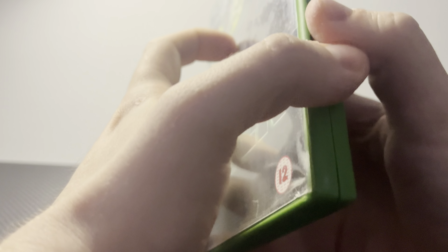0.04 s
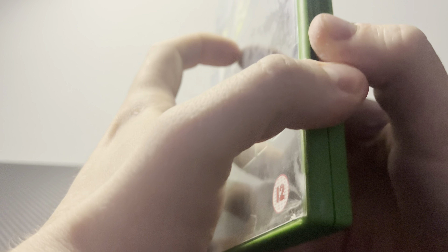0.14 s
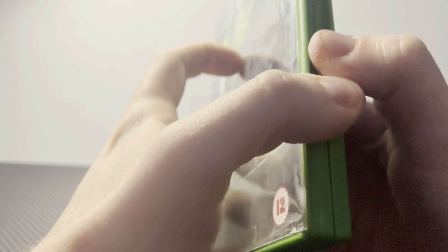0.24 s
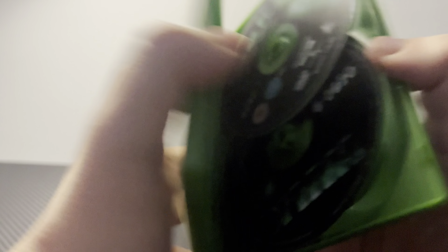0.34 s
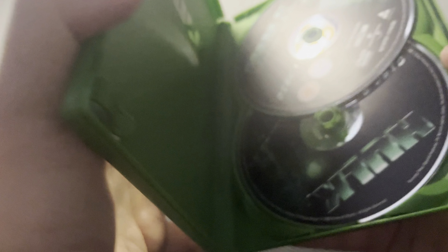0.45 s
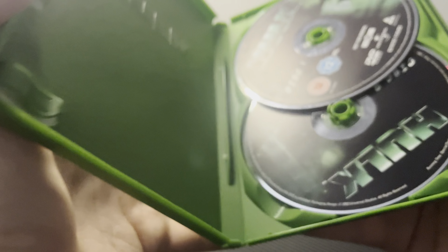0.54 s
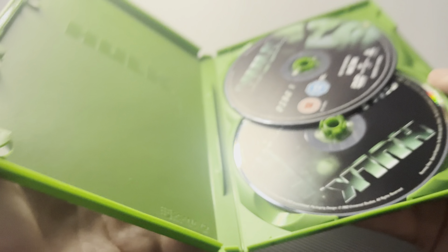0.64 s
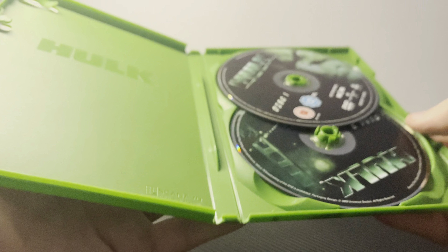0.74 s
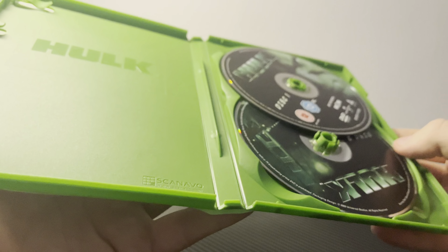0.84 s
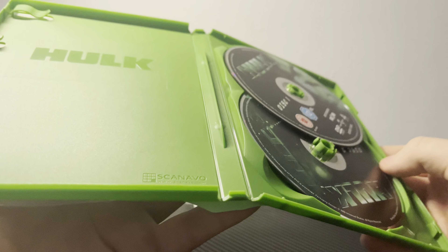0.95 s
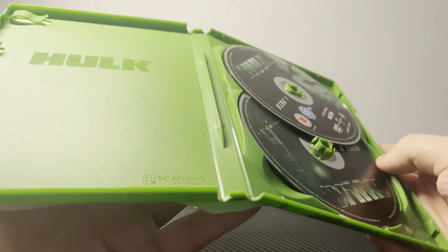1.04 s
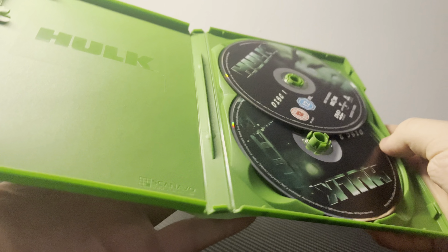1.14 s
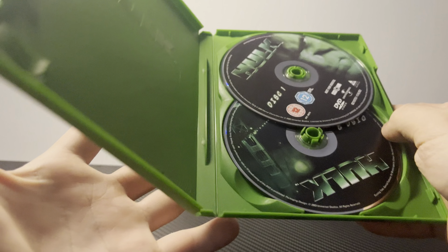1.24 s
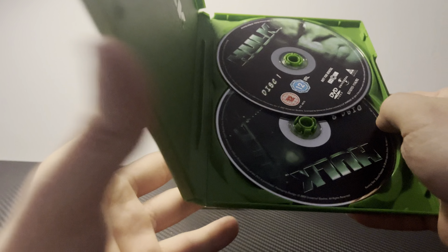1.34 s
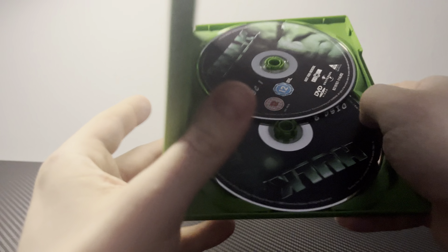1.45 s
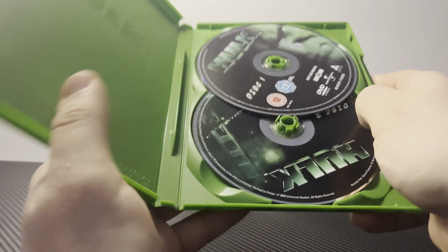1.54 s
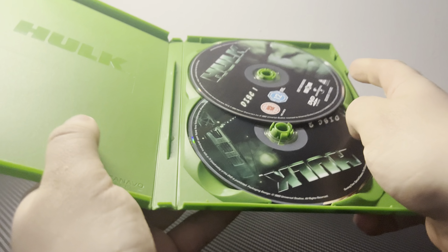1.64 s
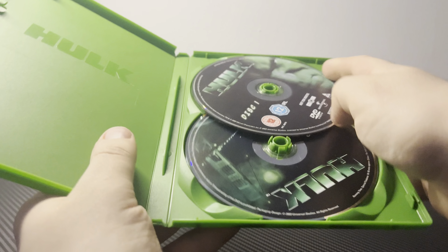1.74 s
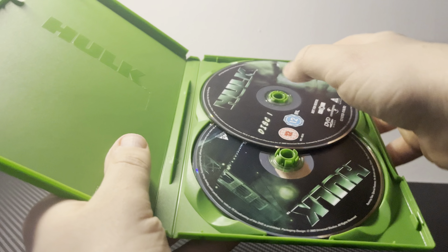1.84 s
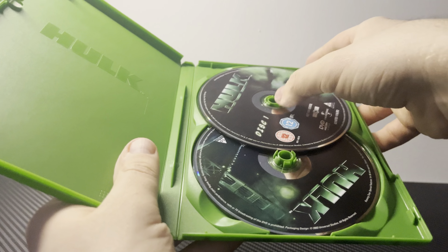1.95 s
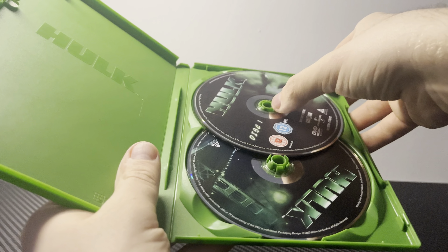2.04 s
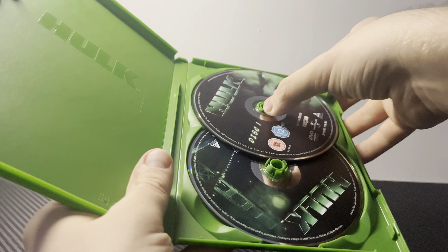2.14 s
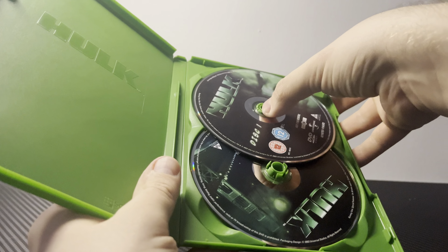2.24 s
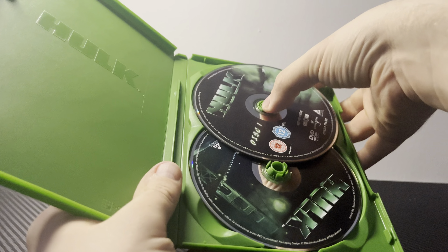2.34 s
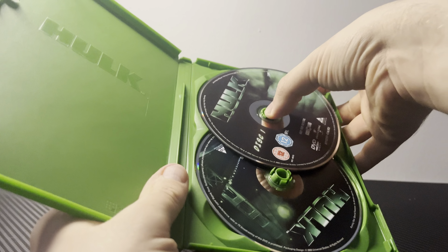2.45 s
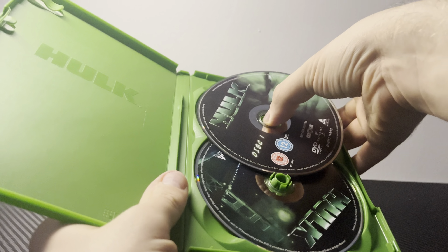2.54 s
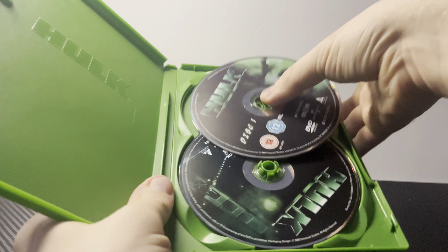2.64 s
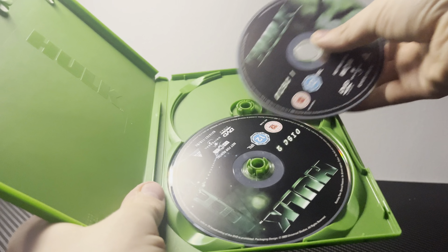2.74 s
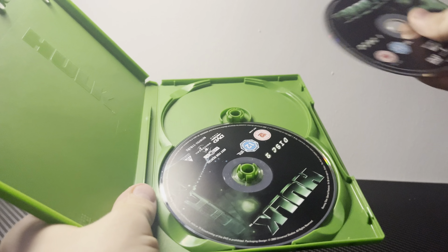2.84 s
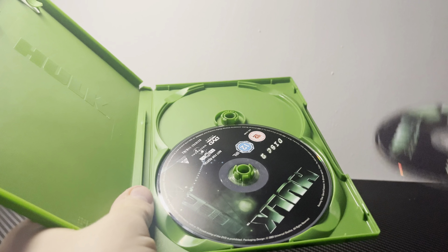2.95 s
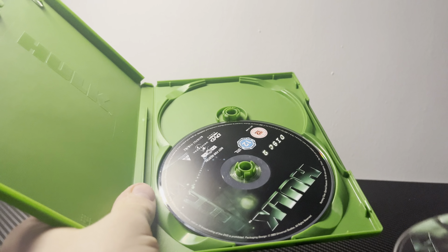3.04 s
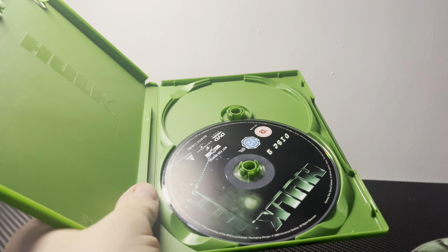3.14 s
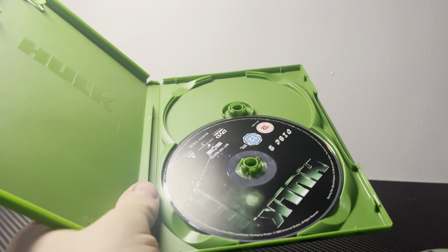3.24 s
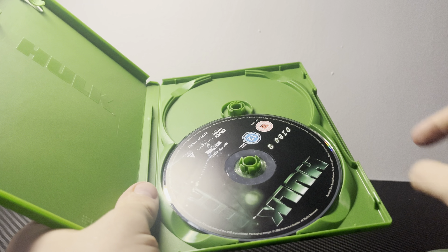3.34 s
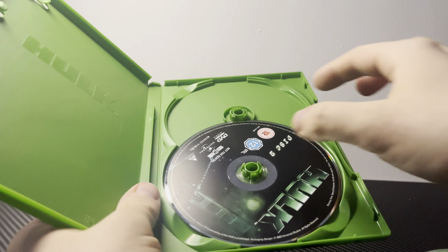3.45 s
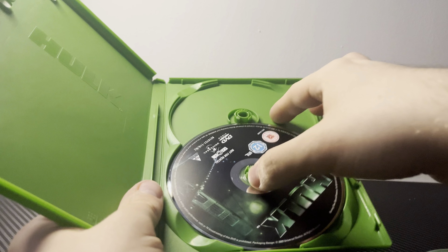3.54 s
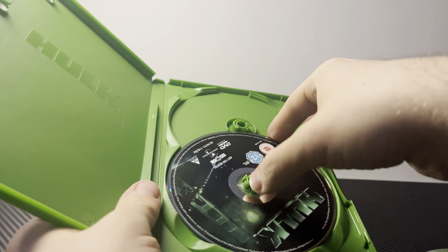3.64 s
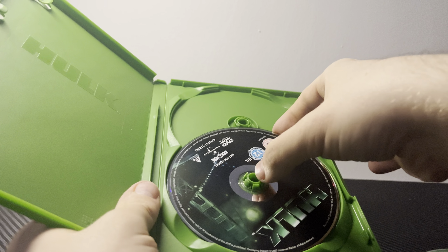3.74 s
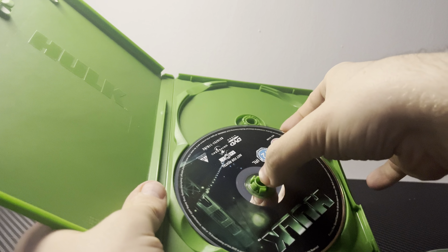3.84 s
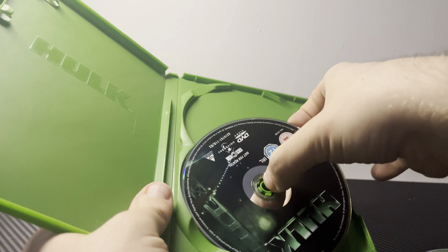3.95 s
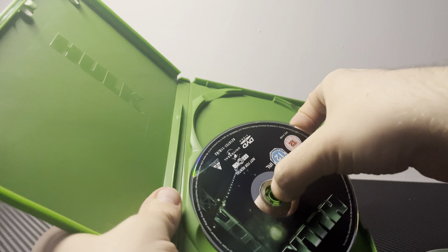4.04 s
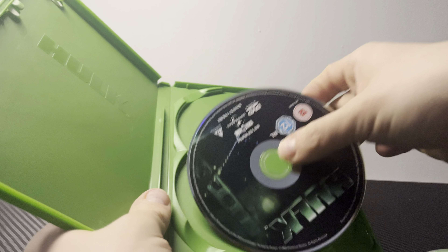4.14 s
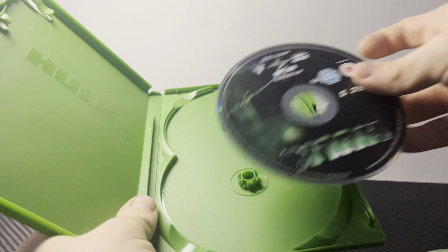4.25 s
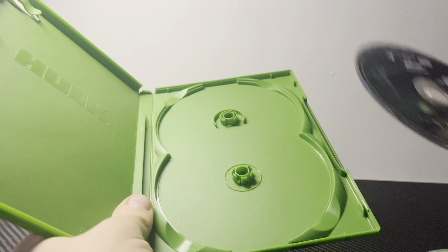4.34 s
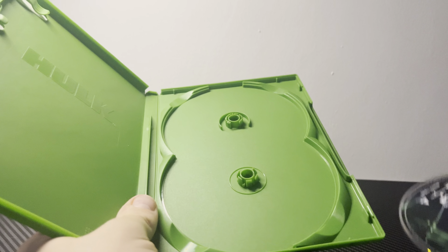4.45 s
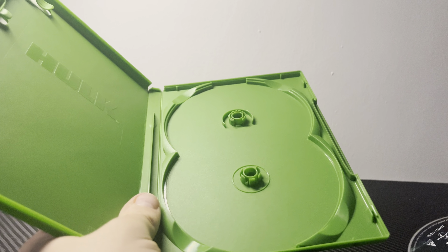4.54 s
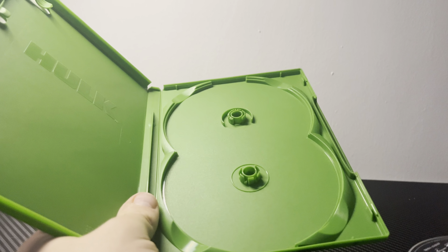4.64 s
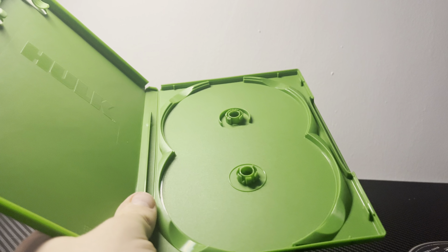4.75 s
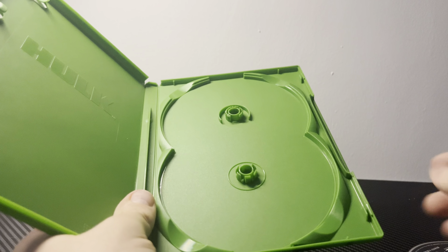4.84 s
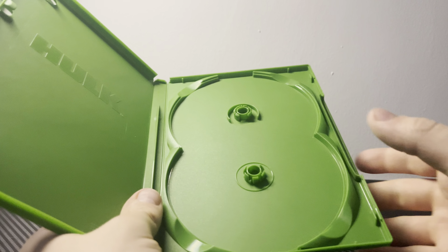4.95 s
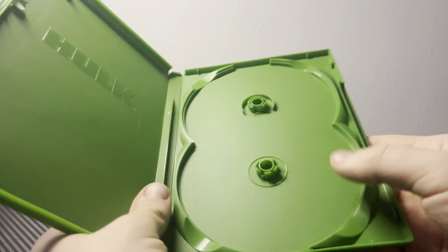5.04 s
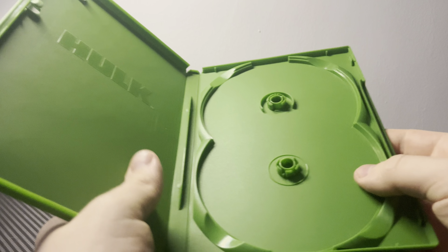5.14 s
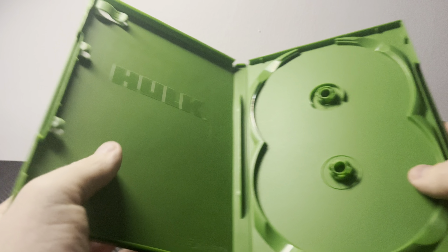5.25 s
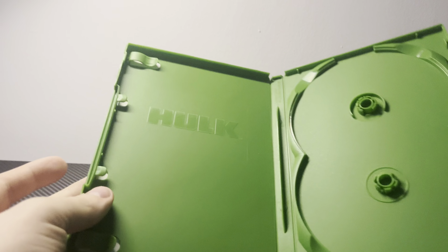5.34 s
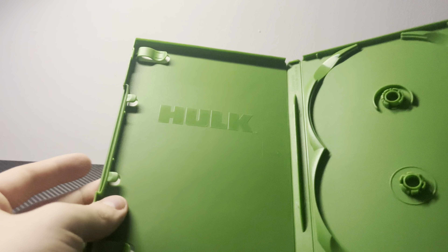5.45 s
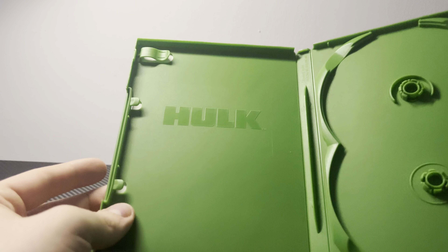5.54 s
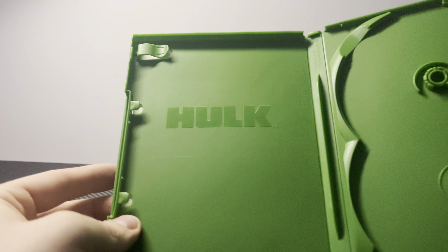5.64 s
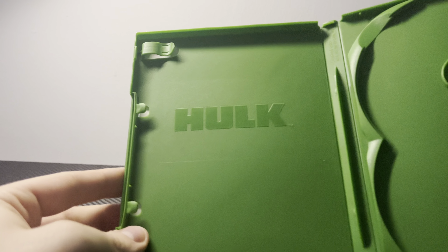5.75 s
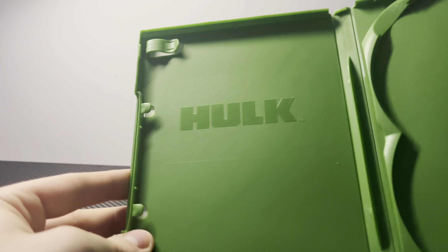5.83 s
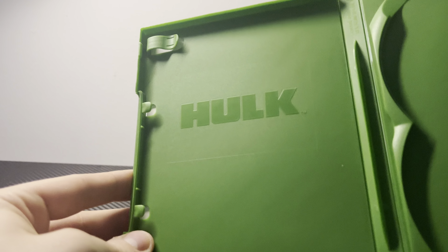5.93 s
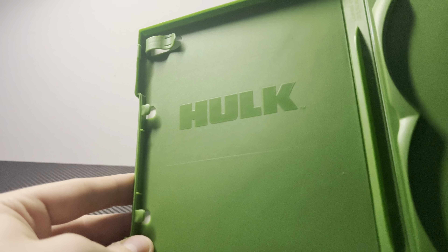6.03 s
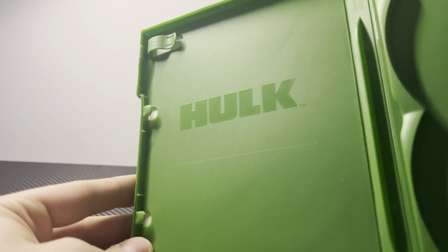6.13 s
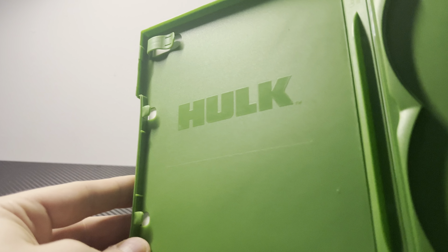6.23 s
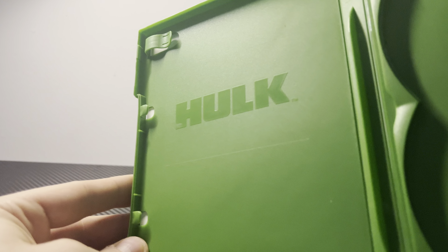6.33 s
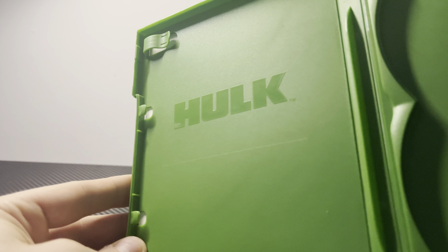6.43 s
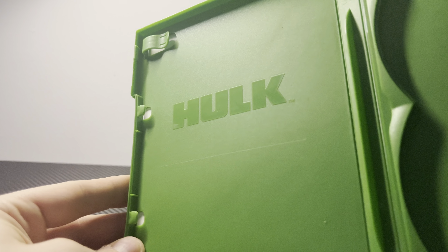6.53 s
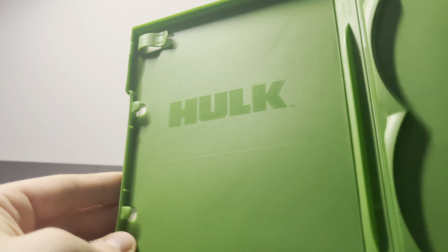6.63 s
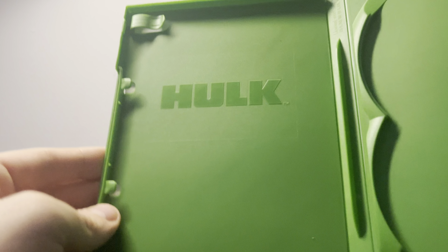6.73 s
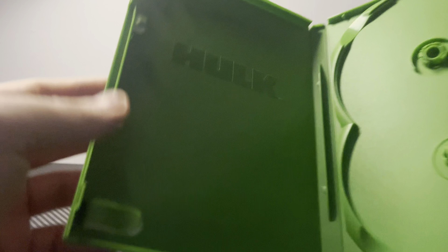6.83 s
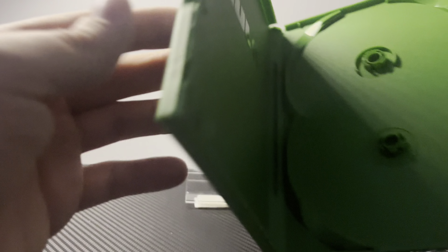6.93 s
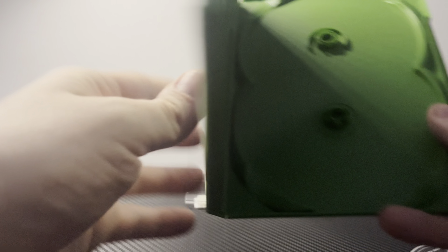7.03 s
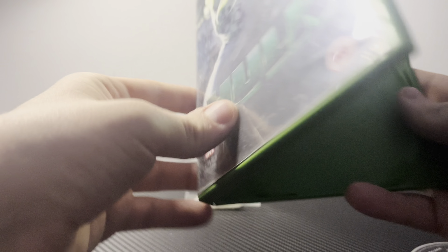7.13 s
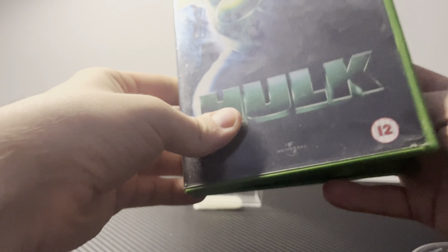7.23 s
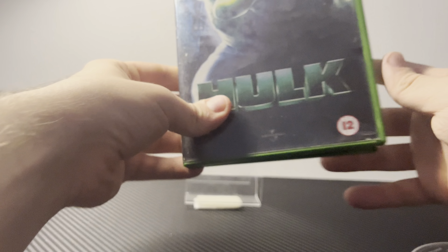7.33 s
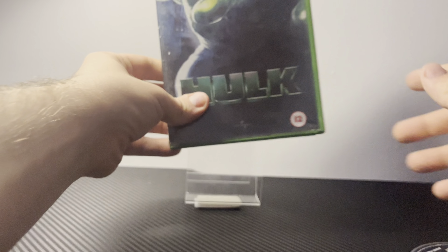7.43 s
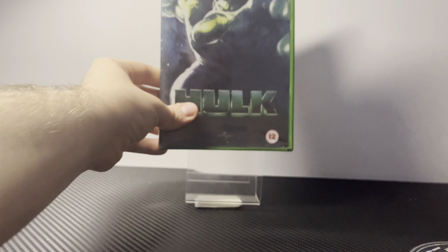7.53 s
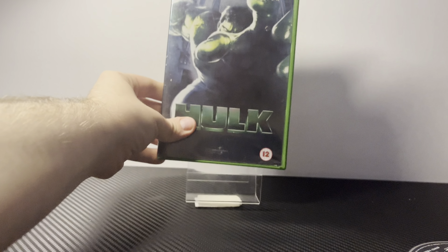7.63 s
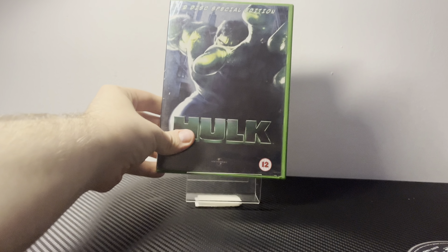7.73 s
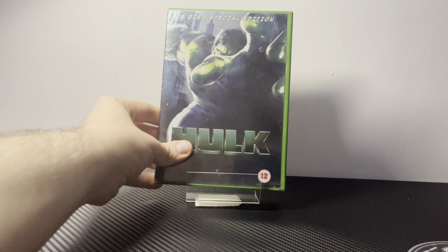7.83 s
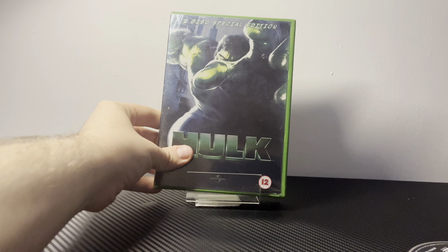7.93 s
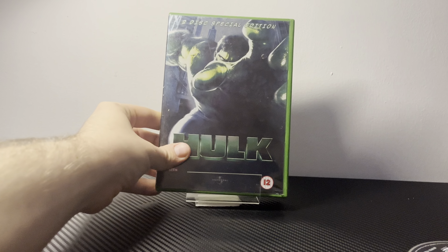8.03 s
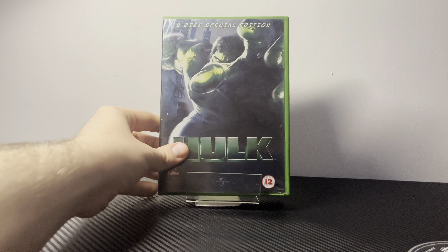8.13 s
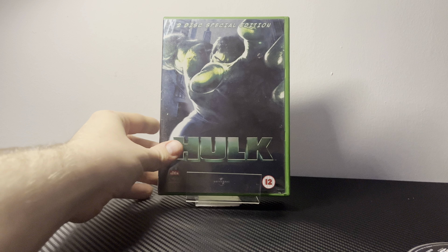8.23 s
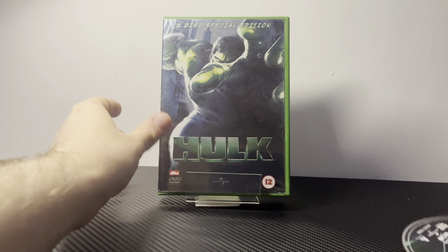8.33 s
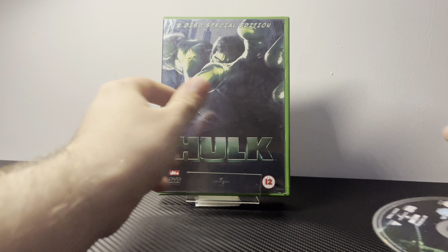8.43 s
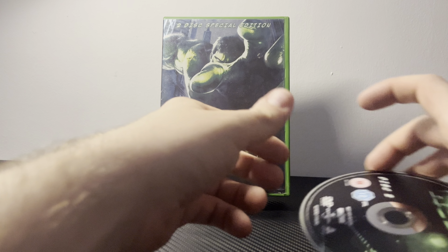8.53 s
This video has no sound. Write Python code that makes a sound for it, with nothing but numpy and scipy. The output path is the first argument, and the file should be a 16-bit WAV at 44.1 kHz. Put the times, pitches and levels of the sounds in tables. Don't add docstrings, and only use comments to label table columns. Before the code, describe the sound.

Dry, detailed handling of hard plastic over faint room air and mains hum. A hard opening crack comes first, trailed by creaks, loose ticks and skin rubbing. Two discs are pressed free in turn with bright double snaps, brief rings and soft thuds on the table. Quieter rubbing and gentle closing clicks lead to a hollow knock and small scrapes as the case settles on a rack. Close stereo phone pickup, short soft room tail.

```python
import sys
import numpy as np
from scipy import signal
from scipy.fft import rfft, irfft
from scipy.io import wavfile
from scipy.ndimage import uniform_filter1d

SR = 44100
rng = np.random.default_rng(int(sys.argv[2]) if len(sys.argv) > 2 else 0)


def inscribe(sig):
    pcm = np.round(np.clip(np.atleast_2d(sig).T, -1, 1) * 32767)
    wavfile.write(sys.argv[1], SR, pcm.astype(np.int16))


def voltage_ratio(decibels):
    exponent = np.asarray(decibels, float) / 20
    return 10 ** exponent


N = 378378

# [f/Hz, level/dB, t60/s]
CASE_MODES = [(370, -2, 0.033), (697, 1.5, 0.034), (980, -16, 0.043), (1440, -1, 0.0042),
              (2310, 6.5, 0.013), (2400, -3.5, 0.0065), (2610, -0.5, 0.014), (3314, -4.5, 0.04),
              (3920, -6, 0.058), (4800, -10.5, 0.029), (4990, -12, 0.012)]
# [f/Hz, level/dB, t60/s]
RACK_MODES = [(291, -4, 0.29), (740.4, 6, 0.052), (952, 4.5, 0.044), (1004, 8.5, 0.052), (1520, -4, 0.024),
              (1800, -20.5, 0.02), (2564, 3, 0.0093), (5000, -10, .04)]
# [t/s, level/dB]
GRIP = [(0.0, -76), (0.45, -51.5), (0.83, -65), (2.05, -51.5), (2.29, -67.5), (2.79, -57.5), (3.6, -57),
        (4.34, -60), (5.61, -60), (6.3, -74.5), (6.8, -72.5), (7.28, -58.5), (7.49, -67.5), (7.99, -50),
        (8.26, -63.5), (8.57, -77.5)]
# [t/s, lean (1 = usual left lean)]
LEAN = [(0, 0.75), (.7, 1.31), (1.3, 0.82), (2.5, 0.88), (3.3, 0.7), (4.2, 1.8), (5.5, 0.97), (6.8, 2),
        (7.2, 0.32), (7.6, 1.04), (8.5, 1.1)]
HANDS_PAN_DB = 5


def on_log(hz, table):
    f, v = np.transpose(table)
    return np.interp(np.log(hz + 1), np.log(f), v)


def over_time(t, table):
    return np.interp(t, *np.transpose(table))


def colour(x, table):
    gain = voltage_ratio(on_log(np.fft.rfftfreq(x.shape[-1], 1 / SR), table))
    y = irfft(rfft(x) * gain, x.shape[-1])
    return y / np.sqrt(np.mean(y ** 2))


def pair(size):
    # [f/Hz, likeness (0-1)]
    likeness = [(100, 0.8), (500, 0.2), (2000, 0.5), (4000, 0.2), (12000, 0.9)]
    like = np.clip(on_log(np.fft.rfftfreq(size, 1 / SR), likeness), 0, 1)
    mid, side = rfft(rng.standard_normal((2, size)))
    return irfft(mid * np.sqrt(1 + like) + side * np.sqrt(1 - like) * np.array([[1], [-1]]), size)


def walk(rate_hz):
    k = int(SR / rate_hz)
    held = np.repeat(rng.standard_normal(N // k + 1), k)
    return 1.2 * uniform_filter1d(held, k)[:N]


def band(x, lo_hz, hi_hz):
    return signal.sosfilt(signal.butter(2, [lo_hz, hi_hz], "bandpass", fs=SR, output="sos"), x)


def peak_one(x):
    return x / np.max(np.abs(x))


def decay(t, t60_s):
    return np.exp(-np.log(1000) * t / t60_s)


def resonate(x, modes, spread):
    y = sum(voltage_ratio(db) * band(x, hz / spread, hz * spread) for hz, db, _ in modes)
    return y / np.std(y)


def add(out, x, s, lean=0.66):
    pan_db = lean * HANDS_PAN_DB * over_time(s, LEAN)
    lag = int(np.clip(np.round(-0.5 - 0.66 * pan_db), -12, 12))
    for ch, (delay, sign) in enumerate([(lag, 1), (0, -1)]):
        i = int(s * SR) + delay
        n = min(x.shape[-1], N - i)
        out[ch, i:i + n] += x[ch, :n] * voltage_ratio(sign * pan_db / 2)


def muted(x, s):
    # [from t/s, to t/s, cutoff f/Hz]
    clamped = [
        (.1, .32, 3360),
        (.59, .8, 1304),
        (6.8, 6.9, 2670),
    ]
    for from_s, to_s, hz in clamped:
        if from_s < s < to_s:
            return peak_one(signal.sosfilt(signal.butter(6, hz, "highpass", fs=SR, output="sos"), x))
    return x


def clicks(table, modes, contact_s, rattle_db, ring_db, body_db, top_db):
    out, t = np.zeros((2, N)), np.arange(int(SR / 8)) / SR
    hz, db, t60_s = np.transpose(modes)[:, :, None]
    high = hz[:, 0] > 1500
    blow = 12 * (t == t[int(.001 * SR)])
    for s, peak_db, rel_body_db, rel_top_db in table:
        level_luck, pitch_luck, angle = rng.standard_normal((3, len(modes), 1))
        shape = np.exp(-t / contact_s) + voltage_ratio(rattle_db) * np.exp(-t / 0.0087)
        contact = pair(len(t)) * (1 - np.exp(-t / 0.0025)) * shape
        phase = np.array([1, -1])[:, None, None] * angle * np.minimum(hz / 1500, 1)
        waves = np.sin(2 * np.pi * hz * (1 + 0.0086 * pitch_luck) * t + phase)
        rings = voltage_ratio(db + 2 * level_luck) * decay(t, t60_s) * waves

        def struck(chosen):
            ring = rings[:, chosen].sum(axis=1)
            return peak_one(signal.fftconvolve(ring, contact[:1] + blow, axes=1)[:, :len(t)])

        body = peak_one(struck(~high) + 0.8 * peak_one(band(contact, 110, 1500)))
        snap = peak_one(band(band(contact, 1400, 7200), 1400, 7200))
        crack = peak_one(snap + voltage_ratio(ring_db) * struck(high))
        spit = contact * (np.exp(-t / 0.003) + 0.18)
        spit = peak_one(band(band(spit, 7900, 14500), 7900, 14500))
        mix = muted(crack, s) + voltage_ratio(rel_body_db + body_db) * body + voltage_ratio(rel_top_db + top_db) * spit
        add(out, voltage_ratio(peak_db) * mix, s)
    return out


def background():
    # [f/Hz, level/(dB per Hz)]
    air_colour = [(15, -38.5), (25, -16), (105, -1), (145, -19), (317, -24), (641, -33), (734, -35),
                  (1740, -35.5), (2480, -39.5), (4870, -38), (7710, -42), (12200, -48), (16000, -59)]
    # [f/Hz, level/dB rms]
    hum_lines = [(50, -67), (100, -66.5), (190, -74)]
    t = np.arange(N) / SR
    hum = 0
    for hz, db in hum_lines:
        hum = hum + voltage_ratio(db + 2.5 * walk(1.7)) * np.sqrt(2) * np.sin(2 * np.pi * hz * t + 0.73 * walk(3))
    air = colour(pair(N), air_colour)
    air += 0.27 * band(air, 500, 12000) * np.array([[1], [-1]])
    hum_swing_db = 0.76 * (over_time(t, GRIP) + 63.0)
    return voltage_ratio(-65 + 0.5 + 0.6 * walk(0.75)) * air + hum * voltage_ratio(hum_swing_db)


def grip_rumble():
    # [f/Hz, level/(dB per Hz)]
    rumble_colour = [(15, -46), (25, -12), (65, 1.5), (86, 5), (112, -5), (156, -2), (350, -20), (460, -40),
                     (770, -120)]
    level_db = over_time(np.arange(N) / SR, GRIP) - 2 + 3.8 * np.tanh(walk(7.4))
    return colour(pair(N), rumble_colour) * voltage_ratio(level_db)


def patchy():
    edges_hz = 700 * 2 ** np.arange(0, 4.6, .4)
    return sum(band(pair(N), lo, hi) * voltage_ratio(2.5 * walk(25)) for lo, hi in zip(edges_hz, edges_hz[1:]))


def rubbing():
    # [start t/s, hold/s, hiss level/dB, panel level/dB re hiss]
    hand_strokes = [(0.0, 0.12, -79.5, 1.5), (0.175, 0.051, -58.5, -6), (0.35, .01, -55.5, -9),
                    (0.371, 0.016, -27.5, -4), (0.419, 0.017, -47, 9.5), (0.521, 0.004, -46, -7.5),
                    (0.567, 0.076, -55, -3), (0.681, 0.11, -59, -38), (0.981, 0.0052, -46.5, -10.5),
                    (1.043, 0.1, -63.5, -10.5), (1.166, 0.094, -67.5, 9.5), (1.454, 0.058, -54, 3.5),
                    (1.583, 0.11, -52.5, 0), (1.76, 0.04, -52.5, 1.5), (1.892, 0.038, -54.5, 5.5),
                    (2, 0.025, -48, 1), (2.082, 0.015, -54.5, 4), (2.161, 0.013, -65, 10.5),
                    (2.292, 0.073, -76, -7.5), (2.432, 0.05, -51.5, -15.5), (2.602, 0.029, -49, 7.5),
                    (2.687, 0.032, -41, -30), (2.771, 0.0081, -51, 5), (2.824, 0.041, -65.5, 3),
                    (3.15, 0.13, -58, -3), (3.566, 0.076, -61, -2), (3.737, 0.072, -70, 15.5),
                    (4.165, 0.028, -41.5, -18.5), (4.229, 0.045, -68.5, -24.5), (4.359, 0.1, -71.5, -16),
                    (4.549, 0.0065, -54.5, -2), (4.654, 0.034, -52, 0), (4.71, 0.014, -74, 7),
                    (5.034, 0.0071, -65, -6.5), (5.15, 0.035, -53.5, -13), (5.225, 0.12, -53.5, -17),
                    (5.649, 0.092, -59.5, -2), (5.79, 0.055, -71, -1), (5.9, 0.19, -75, -5),
                    (6.7, 0.13, -77, -4), (6.854, 0.016, -61.5, -23), (7.04, 0.039, -75.5, 12),
                    (7.1, 0.03, -59.5, -9), (7.24, 0.035, -66, -7.5), (7.289, 0.013, -52.5, -3),
                    (7.38, 0.24, -75.5, -5.5)]
    # [start t/s, hold/s, hiss level/dB, panel level/dB re hiss]
    rack_strokes = [(7.58, 0.044, -68, 8), (7.65, 0.11, -71.5, 14.5), (7.87, 0.017, -54.5, 9.5),
                    (7.905, 0.03, -70.5, 18.5), (7.999, 0.0069, -51.5, 12.5), (7.78, 0.087, -74.5, -18),
                    (8.03, .03, -68, -3), (8.065, 0.017, -53, 2), (8.093, 0.0069, -59, 18.5),
                    (8.13, 0.08, -78, -3), (8.546, 0.025, -75.5, 9.5)]
    # [f/Hz, level/(dB per Hz)]
    skin_colour = [(710, -40.5), (1200, -15.5), (2020, -13.5), (2270, -17.5), (2530, -9.5), (3910, -7),
                   (5710, -8.5), (8000, -7.5), (9930, -16), (12300, -13.5), (14200, -19.5), (15000, -55)]
    # [f/Hz, level/(dB per Hz)]
    panel_colour = [(150, -23.5), (250, -0.5), (650, -8), (1040, -11.5), (1600, -14.5), (3000, -24.5),
                    (6000, -51)]
    rack_from_s = 7.5
    t = np.arange(N) / SR
    hiss_gain, panel_gain = np.zeros((2, N))
    for s, hold_s, hiss_db, panel_db in [*hand_strokes, *rack_strokes]:
        press_db_per_s, lift_db_per_s = 498, 351
        if s > rack_from_s:
            press_db_per_s, lift_db_per_s = 4 * press_db_per_s, 2 * lift_db_per_s
        near = slice(max(int((s - 1 / 4) * SR), 0), int((s + hold_s + 1 / 3) * SR))
        early_s = np.maximum(s - t[near], 0)
        late_s = np.maximum(t[near] - s - hold_s, 0)
        touch = voltage_ratio(hiss_db - press_db_per_s * early_s - lift_db_per_s * late_s)
        hiss_gain[near] += touch
        panel_gain[near] += touch * voltage_ratio(panel_db)
    slips = voltage_ratio(1.5 * walk(70) + 3.2 * walk(400))
    grain, deep = patchy() * slips, pair(N) * slips
    hiss = colour(grain, skin_colour) + voltage_ratio(-17.5) * resonate(grain, CASE_MODES[3:], 1.025)
    rack = resonate(deep, [*RACK_MODES[1:6], *RACK_MODES[7:]], 1.045)
    panel = np.where(t > rack_from_s, rack, colour(deep, panel_colour))
    sides = voltage_ratio(HANDS_PAN_DB * over_time(t, LEAN) * np.array([[.5], [-.5]]))
    return sides * (voltage_ratio(1.5) * hiss_gain * hiss + voltage_ratio(-1.0) * panel_gain * panel)


def resonances():
    # [t/s, f/Hz, peak level/dB, t60/s]
    pings = [(.167, 4660, -29.5, .03), (0.337, 1043, -20.5, .05), (.424, 2390, -25.5, 0.027),
             (0.601, 1586, -55, 0.049), (0.661, 1560, -36.5, 0.097), (.66, 2210, -40, .03),
             (0.691, 1560, -41, 0.072), (0.767, 1504, -41, 0.05), (.961, 2395, -40, 0.031),
             (1.192, 4010, -46.5, .04), (1.213, 2310, -40, 0.062), (1.251, 3950, -47, 0.055),
             (1.258, 2265, -43, 0.056), (1.441, 2290, -45.5, 0.034), (1.469, 2310, -44, .06),
             (1.505, 2310, -42, 0.055), (1.584, 2280, -44.5, 0.043), (1.602, 2250, -46, .05),
             (1.627, 3940, -57, 0.057), (1.669, 2180, -47, .04), (1.766, 1257, -48, 0.091),
             (1.894, 3300, -44.5, .04), (1.912, 2307, -30.5, .06), (2.026, 2283, -30.5, 0.036),
             (2.029, 4030, -40, .05), (2.075, 3320, -41, .04), (2.168, 2250, -43, .05),
             (2.168, 3980, -48.5, .05), (2.182, 3990, -45.5, .04), (2.181, 2296, -46.5, .03),
             (2.479, 2310, -21, 0.15), (2.598, 740, -18.5, 0.041), (2.772, 2680, -29, 0.074),
             (3.912, 3420, -20, .05), (3.912, 5500, -16, .04), (3.953, 2390, -18, .1),
             (4.12, 950, -30.5, .02), (4.139, 1720, -33, .04), (4.689, 5360, -30, .015),
             (7.03, 396, -51, 0.051), (7.575, 1874, -27, 0.017), (7.574, 4600, -28, 0.03),
             (7.583, 2510, -35.5, 0.052), (7.749, 1033, -48, 0.051), (7.998, 1060, -25.5, 0.04),
             (8.543, 1800, -46, 0.025), (8.545, 320, -53.5, 0.039)]
    # [start t/s, length/s, f/Hz, peak level/dB]
    judders = [(.01, 0.026, 559, -52), (0.36, .032, 2285, -22), (0.12, 0.018, 663, -57.5),
               (1.138, .04, 2332, -52.5), (1.14, 0.036, 1531, -50), (2.561, 0.037, 2460, -45),
               (2.687, .018, 4010, -36), (2.702, .022, 3294, -48), (2.688, .015, 4773, -41),
               (2.73, 0.009, 4070, -44), (4.1578, .012, 3970, -34), (4.159, 0.047, 1765, -36),
               (4.168, 0.018, 2730, -33), (4.17, .012, 5394, -34.5), (4.182, .009, 2617, -31.5),
               (4.182, .009, 3890, -31.5), (4.18, 0.011, 1723, -33.5), (4.196, 0.0059, 2473, -41),
               (4.185, 0.0086, 4280, -41.5), (7.642, 0.027, 1649, -46.5), (7.674, 0.081, 1652, -50),
               (7.694, 0.055, 2000, -54), (.553, .008, 688, -41), (0.53, .012, 700, -47),
               (0.58, .012, 250, -37.5), (0.67, .012, 720, -49), (5.345, .015, 492, -47),
               (7.6, .03, 380, -47.5), (2.759, 0.019, 1151, -33), (4.19, .025, 998, -44),
               (4.641, .008, 960, -41.5), (7.731, 0.033, 740, -44), (7.748, 0.034, 430, -56.5),
               (8.068, 0.053, 520, -44.5), (7.895, 0.047, 305.7, -53), (8.056, 0.038, 280.6, -40),
               (7.33, .012, 1550, -46)]
    push_time_s, judder_t60_s, slips_per_s = 0.0007, 0.027, 700
    out, t = np.zeros((2, N)), np.arange(int(SR / 5)) / SR
    rows = [(s, push_time_s, hz, db, t60_s) for s, hz, db, t60_s in pings]
    rows += [(s, length_s, hz, db, judder_t60_s) for s, length_s, hz, db in judders]
    size = int(.005 * SR)
    for s, push_s, hz, peak_db, t60_s in rows:
        luck, angle = rng.random((2, len(t))), rng.standard_normal()
        slips = (luck[0] < slips_per_s / SR) * luck[1] * (t < push_s) + (t == 0) / 2
        drift, swell = uniform_filter1d(rng.standard_normal((2, len(t))), size, axis=1) * np.sqrt(size)
        blur = voltage_ratio(3 * uniform_filter1d(swell, size))
        phase = 0.5 * angle * min(hz / 1500, 1) * np.array([[1], [-1]])
        wave = np.sin(2 * np.pi * hz * t + phase + .65 * drift)
        mode = decay(t, max(t60_s, .005)) * (1 - np.exp(-t / push_time_s)) * blur * wave
        add(out, voltage_ratio(peak_db) * peak_one(signal.fftconvolve(mode, slips[None], axes=1)[:, :len(t)]), s)
    return out


def case_clicks():
    # [t/s, crack peak level/dB, body level/dB re crack, top level/dB
    case_contacts = [(0.167, -19, -15, -4), (0.2122, -44, 3.5, -5.5), (0.2628, -37.5, -8, -2.5),
                     (0.3005, -33, -19, -4.5), (0.3381, -1.5, 1, -16.5), (0.3477, -5.5, -3, -20.5),
                     (0.411, -16, -12, -16.5), (0.4239, -12.5, -9, -26), (0.4594, -25, -6, -21.5),
                     (0.4878, -25.5, -11, -14), (0.5222, -27, -33, -8.5), (0.5437, -23, -12, -26),
                     (0.601, -22.5, -47.5, -11), (0.6598, -21, -20, -10.5), (0.6918, -18, -54, -16),
                     (0.7358, -34.5, -35, -4), (0.7677, -25.5, -64.5, -5.5), (0.9607, -24, -42, -12.5),
                     (0.9877, -29.5, -13.5, -2),
                     (1.0986, -42.5, -7, -4.5), (1.1928, -34.5, -8, -22), (1.2127, -32, -7.5, -22),
               (1.2506, -32, -7.5, -21), (1.4407, -40.5, -7, -6.5), (1.4697, -37.5, -5, -15),
               (1.505, -34.5, -4.5, -23), (1.5835, -42, 3.5, -24), (1.6686, -31.5, -9, -20),
               (1.7635, -29.5, -5.5, -26), (1.832, -33, -5.5, -24), (1.889, -37.5, -27, -23),
               (1.9121, -20.5, -10, -25), (1.9492, -34.5, -26, -12.5), (2.0022, -32, -27, -11),
               (2.027, -21, -9.5, -15), (2.0386, -26, -7, -29), (2.0761, -26, -7.5, -20.5),
               (2.1525, -33.5, -11, -20.5), (2.1669, -29.5, -7, -20.5),
                     (5.0909, -38.5, -10, -16), (5.0993, -40, -3.5, -10), (5.1692, -42.5, -6.5, -1.5),
                (5.3412, -37, -2.5, -9), (5.721, -44.5, 1, -23), (6.8184, -47.5, -4.5, -13),
                (6.8358, -28, -39, -13.5), (7.028, -48, -4, -2.5), (7.057, -42, -33, -22),
                (7.1028, -46, -5, -4), (7.292, -35.5, -10, -10), (7.3362, -40, -6.5, -9)]
    return clicks(case_contacts, CASE_MODES, 0.0016,
                  rattle_db=-19.5, ring_db=-7.0, body_db=0.0, top_db=8.0)


def thumps():
    # [t/s, peak level/dB, f/Hz]
    knocks = [(0.344, -10.5, 196), (0.348, -19, 110), (0.357, -22, 60.6), (0.549, -37.5, 223),
              (1.491, -42, 61), (1.771, -44, 110), (2.028, -38.5, 112), (2.486, -43, 256),
              (2.601, -24, 232), (2.769, -40.5, 102), (3.095, -37, 97.2), (3.273, -38, 115.8),
              (3.959, -26, 115), (3.953, -20.5, 169), (3.975, -30, 66), (4.536, -40, 108),
              (4.65, -45, 96.5), (4.695, -25.5, 104.5), (5.1, -35.5, 58.8), (5.355, -36, 63.5),
              (5.725, -44.5, 99), (7.028, -42, 102.8), (7.104, -39.5, 81.2), (7.586, -36.5, 108),
              (7.906, -38.5, 100.6), (8.012, -39, 216), (8.122, -32.5, 107)]
    out, t = np.zeros((2, N)), np.arange(int(SR / 3)) / SR
    for s, peak_db, hz in knocks:
        t60_s = 5.1 / hz + 0.059 * np.exp(-np.log(hz / 108) ** 2 / 0.14)
        fade = decay(t, max(t60_s, .02)) * (1 - np.exp(-t / 0.0048))
        overtone = 0.37 * np.sin(2 * np.pi * 2.3 * hz * t) * np.exp(-t / 0.024)
        wave = np.sin(2 * np.pi * hz * t) + overtone
        add(out, voltage_ratio(peak_db + 2.5) * peak_one(fade * wave) * np.ones((2, 1)), s, lean=0.39)
    return out


def loose_ticks():
    # [t/s, crack peak level/dB, body level/dB re crack, top level/dB re crack]
    ticks = [(.512, -31, -16, -10), (1.4213, -46, -9, -6), (1.627, -52, -12, -21), (1.69, -43.5, -4, -20),
             (1.8144, -35.5, -21, -21), (1.926, -33, -11, -19.5), (2.086, -33, -10.5, -26),
             (2.181, -42.5, -10, -19), (2.82, -41, 0, -7), (3.87, -53, -20.5, -3.5), (4.149, -31, -15, -21),
             (4.1687, -25, -19.5, -18), (4.188, -29.5, -17, -16), (4.198, -26.5, -13.5, -17),
             (7.646, -45, 4, -30), (8.078, -42.5, -8, -23), (.499, -46, -20, -7.5),
             (.572, -38.5, -14, -2.5), (.615, -42.5, -26.5, -5), (.65, -44.5, -27.5, -1)]
    return clicks(ticks, CASE_MODES, 0.0019, rattle_db=-19, ring_db=-4.5, body_db=2.5, top_db=5)


def disc_clicks():
    # [t/s, crack peak level/dB, body level/dB re crack, top level/dB re crack]
    contacts = [(2.4225, -31.5, -21.5, 1), (2.477, 2.5, -19.5, -14), (2.4894, -12, -5, -23.5),
                (2.5959, -2, -13.5, -14), (2.736, -37.5, -2.5, -13), (2.7586, -17.5, -11.5, -14.5),
                (2.7682, -18, -12, -29.5), (3.0899, -25, -12.5, -12), (3.255, -42, -11, -10),
                (3.5659, -39, -12, -18.5), (3.6125, -50.5, -14, -5), (3.8915, -37, 2, -21.5),
                (3.912, -10, -15.5, -14.5), (3.924, -22, -13.5, -19.5), (3.9515, -1.5, -11.5, -9),
                (3.9645, -8, -22.5, -25.5), (4.119, -26.5, -6, -26), (4.138, -20, -12.5, -19),
                (4.5306, -25, -12.5, -7.5), (4.6514, -33.5, -10.5, -5.5), (4.6885, -27.5, -10.5, -1),
                (4.549, -33.5, -17, -5)]
    # [f/Hz, level/dB, t60/s]
    disc_modes = [(318, 0.5, 0.039), (510, -7.5, 0.019), (721, 4, 0.035), (867, 2, 0.056),
                  (1050, -6, 0.057), (2180, -2.5, 0.096), (2390, 2, 0.025), (2794, -1, 0.096),
                  (3110, -4.5, 0.085), (3490, -4, 0.066), (3890, -3, 0.036), (5970, -10, 0.1),
                  (5330, -0.5, .05)]
    return clicks(contacts, disc_modes, .0022, rattle_db=-19.5, ring_db=-12.0, body_db=4.0, top_db=6.5)


def drone():
    start_s, end_s, hz, level_db = 5.4, 6.1, 184.5, -67
    t = np.arange(N) / SR
    running = uniform_filter1d(1. * (t > start_s) * (t < end_s), size=2000)
    wave = np.sin(2 * np.pi * hz * t + walk(34))
    return voltage_ratio(level_db + 2 * walk(6.1)) * np.sqrt(2) * running * wave


def rack_clicks():
    # [t/s, crack peak level/dB, body level/dB re crack, top level/dB re crack]
    contacts = [
        (7.574, -17, -16.5, -25),
        (7.867, -27, -12.5, -63),
        (7.902, -51.5, 6.5, -42),
        (7.992, -38.5, -7, -19),
        (8.114, -43.5, 3.5, -42.5),
        (8.207, -45.5, -34, -9),
        (8.545, -44, -35, -42),
    ]
    return clicks(contacts, RACK_MODES, 0.00104, rattle_db=-24.5, ring_db=0.0, body_db=10.0, top_db=9.5)


def room_tail():
    # [f/Hz, level/dB]
    wall_colour = [(200, -6.5), (500, -3), (3000, -2), (6000, -4), (8100, -3), (10000, -8.5), (14000, -10),
                   (14900, -44)]
    t = np.arange(int(SR / 2)) / SR
    tail = colour(rng.standard_normal((2, len(t))), wall_colour) * decay(t, 0.23) * (t > .004)
    tail /= np.sqrt(np.sum(tail ** 2, axis=1, keepdims=True))
    return voltage_ratio(-13) * tail


def scene():
    rest = background() + grip_rumble() + thumps() + drone()
    near = rubbing() + case_clicks() + loose_ticks() + disc_clicks() + rack_clicks()
    sung = resonances()
    to_room = near + voltage_ratio(-4) * sung
    return near + sung + signal.fftconvolve(to_room, room_tail(), axes=1)[:, :N] + rest


def ports(x):
    # [f/Hz, left minus right level/dB]
    port_tilt = [(250, 0), (650, 0), (2000, -2), (5000, 0), (8000, 3)]
    treble_from_hz, in_step_hz, lag_s, shared = 7100, 11800, .000135, .75
    hz, (left, right) = np.fft.rfftfreq(N, 1 / SR), rfft(x)
    tilt = voltage_ratio(on_log(hz, port_tilt) / 2)
    turn = np.pi * (hz - in_step_hz) * lag_s
    mid = np.cos(turn) * left
    side = -1j * np.sin(turn) * (shared * left + np.sqrt(1 - shared ** 2) * right)
    share = 1 / (1 + (treble_from_hz / (hz + 1)) ** 22)
    apart = np.sqrt(1 - share) * np.array([left * tilt, right / tilt])
    paired = np.sqrt(share) * voltage_ratio(-4.0) * np.array([mid + side, mid - side])
    return irfft(apart + paired, N)


def band_limit(x):
    return signal.sosfilt(signal.butter(12, 16500, fs=SR, output="sos"), x)


def record(dry):
    firm = ports(signal.sosfilt(signal.butter(4, 44, "highpass", fs=SR, output="sos"), dry))
    rounded = 0.85 * np.tanh(firm / 0.91)
    mix = signal.sosfilt(signal.butter(8, 15900, fs=SR, output="sos"), rounded)
    return band_limit(mix)


dry = scene()
out = record(dry)
inscribe(out)
```